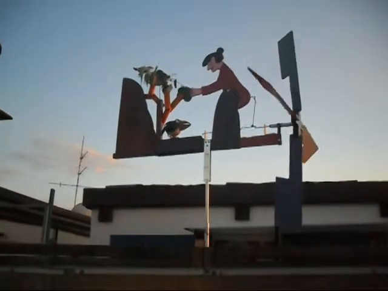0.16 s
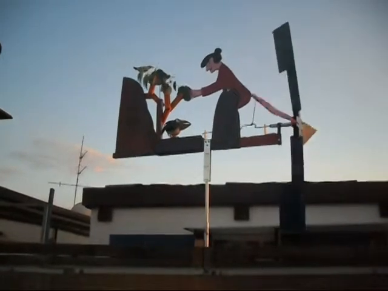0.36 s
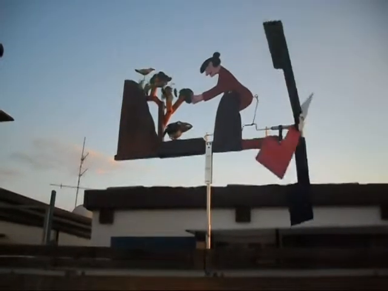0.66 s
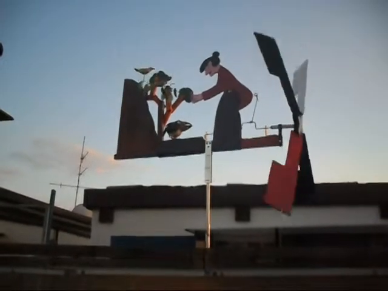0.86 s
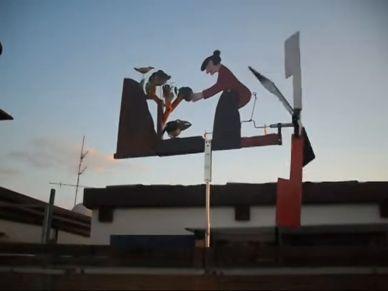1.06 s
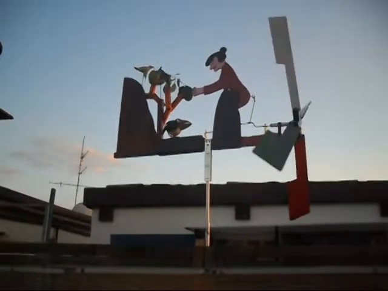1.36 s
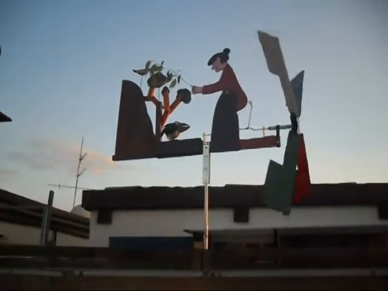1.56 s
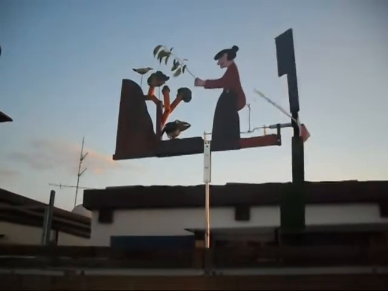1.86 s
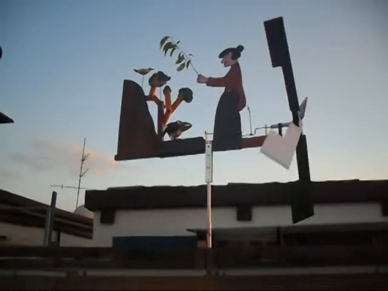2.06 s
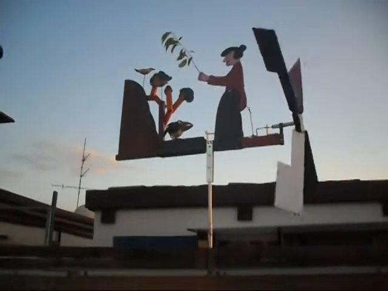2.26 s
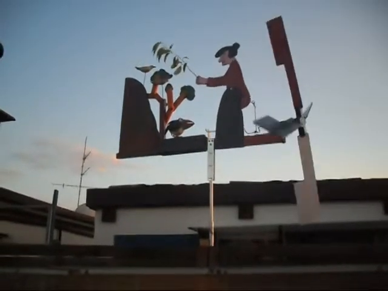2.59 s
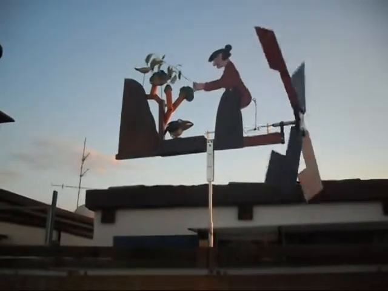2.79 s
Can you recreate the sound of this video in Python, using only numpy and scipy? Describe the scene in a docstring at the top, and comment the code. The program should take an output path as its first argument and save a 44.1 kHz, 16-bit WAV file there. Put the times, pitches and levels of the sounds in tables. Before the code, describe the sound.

Light wind thumps and rumbles low on a microphone outdoors, over faint distant traffic and hiss

```python
"""Low thumps of light wind on a small rooftop microphone at dusk, over far traffic hum and preamp hiss; a swish
passes once, a wooden whirligig ticks faintly. Wind: eddies, each about one cycle of pressure, in a listed set
and a dense random stream, plus slow sway. Traffic, swish and hiss: shaped patchy noise. Whirligig: decaying
sines and one tiny high squeak."""
import sys
import numpy as np
from scipy import signal
from scipy.fft import rfft, irfft
from scipy.io import wavfile
from scipy.ndimage import uniform_filter1d, map_coordinates

SR = 44100
rng = np.random.default_rng(int(sys.argv[2]) if len(sys.argv) > 2 else 0)


def store_pcm(level_fs):
    """Save levels as 16-bit WAV."""
    pcm = np.round(np.clip(level_fs, -1, 1) * 32767).astype(np.int16)
    wavfile.write(sys.argv[1], SR, np.atleast_2d(pcm).T)


def invert_db(level):
    """Linear amplitude ratio for a level in decibels (20 dB per decade), elementwise."""
    return 10 ** (np.asarray(level, dtype=float) / 20)


N = 129213

# course of the small eddies: t/s, level before trim/dB, median f/Hz
STREAM = [(0, -33.5, 72), (.1, -43, 74), (.2, -44, 67), (.4, -46.5, 64), (.62, -44.5, 67.6),
          (.74, -48.5, 85), (.82, -55.5, 93), (.96, -55, 87), (1.07, -50.5, 58.5), (1.18, -43.5, 60.7),
          (1.3, -47, 64), (1.42, -48.5, 73), (1.58, -47.5, 76), (1.72, -51, 90), (1.85, -61, 89),
          (1.96, -58.5, 95), (2.1, -54, 62), (2.3, -60, 51.7), (2.45, -57.5, 50), (2.62, -46, 60.6),
          (2.75, -57, 53), (2.93, -50.5, 61.6)]

# eddy pulse
WIDTH_CYCLES = 0.28
POINTED = 1.28  # exponent: 2 is a round bell, less is a sharper crest
LEAN_RAD = 0.88  # mean carrier phase: a dip leads the push
SHOVE = 0.1  # share of plain one-way pressure under the cycle


def unit(x):
    """Scale to rms 1."""
    return x / np.sqrt(np.mean(x ** 2) + 1e-20)


def curves(rows):
    """Interpolate each column after the time to one value per sample."""
    s, *columns = np.transpose(rows)
    t = np.arange(N) / SR
    return [np.interp(t, s, column) for column in columns]


def wobble(knots_per_s):
    """Smooth random curve: a spline through normal random knots."""
    knots = rng.standard_normal(int(N * knots_per_s / SR) + 4)
    return map_coordinates(knots, [np.arange(N) * knots_per_s / SR])


def rush(spectrum, patchy_db):
    """Coloured noise of rms 1 with random gain patches in time and frequency."""
    z = signal.stft(rng.standard_normal(N + SR), nperseg=512)[2]
    field = uniform_filter1d(rng.standard_normal(z.shape), size=6, axis=0)
    field = uniform_filter1d(field, size=12, axis=1)
    patchy = signal.istft(z * invert_db(patchy_db * unit(field)), nperseg=512)[1][:N + SR]
    f, db = np.transpose(spectrum)
    hz = np.fft.rfftfreq(len(patchy), 1 / SR)
    gain = invert_db(np.interp(np.log(hz + 1), np.log(f + 1), db))
    return unit(irfft(rfft(patchy) * gain, len(patchy))[:N])


def preamp_hiss():
    """Steady preamp noise as slightly patchy coloured noise."""
    # f/Hz, relative density/dB per Hz
    hiss_spectrum = [(300, -120), (1200, 5), (3000, 1.5), (5000, 0), (7000, -1.5), (10000, -3),
                     (10600, -6.5), (11000, -14), (11030, -120)]
    return invert_db(-71) * rush(hiss_spectrum, patchy_db=0.64)


def far_traffic():
    """Smooth far roar plus a separate upper edge that fades up over the first 1.3 s."""
    # roar: f/Hz, relative density/dB per Hz
    roar_spectrum = [(120, -120), (200, -7), (300, -0.5), (420, -6), (600, -4.5), (900, -4.5), (1300, -5.5),
                     (1700, -11), (2200, -16.5), (2800, -23.5), (4000, -27), (6000, -120)]
    # roar: t/s, level before trim/dB
    roar_level = [(0, -64), (1.13, -62), (1.73, -63), (2.4, -62), (2.93, -61.5)]
    # upper edge: f/Hz, relative density/dB per Hz
    edge_spectrum = [(1000, -53), (1500, -6.5), (1900, -2.5), (2400, -11.5), (3000, -17.5), (4000, -59)]
    # upper edge: t/s, level/dB
    edge_level = [(0, -91), (.6, -80), (1.3, -73), (1.9, -73), (2.4, -72.5), (2.93, -73)]
    trim_db = 0.5
    [roar_db] = curves(roar_level)
    [edge_db] = curves(edge_level)
    roar = invert_db(roar_db + trim_db + 0.27 * wobble(5.6)) * rush(roar_spectrum, patchy_db=0.84)
    return roar + invert_db(edge_db) * rush(edge_spectrum, patchy_db=3.0)


def swish():
    """One soft noise swell: fast rise, hold, slower fall; a late low part dulls its end."""
    # bright part: f/Hz, relative density/dB per Hz
    bright_spectrum = [(900, -60), (1800, -5), (2600, -2), (3500, 0), (4800, -2), (6000, -12), (9000, -60)]
    # low part: f/Hz, relative density/dB per Hz
    low_spectrum = [(500, -60), (1000, -5), (2100, 0), (3000, -3), (4500, -24)]
    start_s, rise_s, hold_s, fall_s = .99, .022, .04, .08
    low_delay_s, low_db, level_db = .03, 3.5, -69.5

    def swell(t):
        """Half-bell rise to t = 0, flat hold, half-bell fall."""
        rise = np.minimum(t, 0) / rise_s
        fall = np.maximum(t - hold_s, 0) / fall_s
        return np.exp(-.5 * rise ** 2 - .5 * fall ** 2)

    t = np.arange(N) / SR - start_s
    bright = invert_db(1.5 * wobble(40)) * swell(t) * rush(bright_spectrum, patchy_db=1.5)
    low = swell(t - low_delay_s) * rush(low_spectrum, patchy_db=1.1)
    return invert_db(level_db) * (bright + invert_db(low_db) * low)


def whirligig():
    """Loose wooden joint: ticks as sums of decaying modes, and one bell-windowed sine squeak."""
    # ticks: t/s, gain/dB
    ticks = [(1.4165, -59), (2.368, -65), (1.694, -67)]
    # joint modes: f/Hz, mean relative level/dB, t60/s
    joint = [(2100, -4, .01), (3500, -4, .01), (4800, -2, .009), (5500, -2, .008), (6400, -4, .008),
             (7300, -3, .009), (8000, -4, .009), (8900, -7, .007)]
    squeak_s, squeak_hz, squeak_db, squeak_width_s = 1.675, 8180, -70, .0033
    out = np.zeros(N)
    t = np.arange(SR // 20) / SR
    onset = 1 - np.exp(-t / 0.00016)
    for s, db in ticks:
        ring = np.zeros(len(t))
        for hz, level_db, t60_s in joint:
            decay = invert_db(level_db + rng.normal(0, 1.5) - 60 * t / t60_s)
            ring += decay * np.sin(2 * np.pi * hz * t)
        out[round(s * SR):][:len(t)] += invert_db(db) * ring * onset
    t = np.arange(N) / SR - squeak_s
    bell = np.exp(-.5 * (t / squeak_width_s) ** 2)
    return out + invert_db(squeak_db) * bell * np.sin(2 * np.pi * squeak_hz * t)


def slow_sway():
    """Slow pressure sway: low noise that partly follows the small-eddy level."""
    # f/Hz, relative density/dB per Hz
    sway_spectrum = [(8, -120), (16, -17), (28, -5.5), (42, -4), (70, -7.5), (130, -12), (190, -21.5),
                     (300, -33), (500, -120)]
    stream_db, _ = curves(STREAM)
    level_db = -49.5 + 0.53 * (stream_db - stream_db.mean()) + 2.78 * wobble(9)
    return invert_db(level_db) * rush(sway_spectrum, patchy_db=1.5)


def pushes(s, db, hz, lean_rad):
    """Each eddy is about one cycle of pressure under a bell-shaped window."""
    hop = 8  # pulses are summed at SR / hop, then upsampled
    lead = SR // hop * hop  # room for pulses that begin before t = 0
    offsets = np.arange(-SR // 20, SR // 20, hop)
    at = np.round(s * SR / hop).astype(int)[:, None] * hop + offsets
    cycles = (at / SR - s[:, None]) * hz[:, None]
    bell = np.exp(-.5 * np.abs(cycles / WIDTH_CYCLES) ** POINTED)
    cycle = np.cos(2 * np.pi * cycles - lean_rad[:, None])
    one_way = SHOVE * np.cos(lean_rad)[:, None]
    wave = invert_db(db)[:, None] * bell * (cycle + one_way)
    coarse = np.bincount(((at + lead) // hop).ravel(), wave.ravel(), (N + 3 * SR) // hop)
    return signal.resample_poly(coarse, hop, 1)[lead:][:N]


def small_eddies():
    """Dense stream of eddies at random times, with random size, pitch and phase."""
    eddies_per_s, trim_db = 120, 1
    size_spread_db, pitch_spread, lean_scatter_rad = 4.5, 0.39, 1.3  # pitch: sd of ln f
    count = int(eddies_per_s * N / SR)
    s = rng.uniform(0, (N - 1) / SR, count)
    size, pitch, lean = rng.standard_normal((count, 3)).T
    stream_db, median_hz = curves(STREAM)
    hz = median_hz[(s * SR).astype(int)] * np.exp(pitch_spread * pitch)
    hz = np.clip(hz, 25, 400)
    stream = unit(pushes(s, size_spread_db * size, hz, LEAN_RAD + lean_scatter_rad * lean))
    return invert_db(stream_db + trim_db) * stream


def listed_eddies():
    """Listed eddies on the microphone port, each a single low push."""
    # t/s, pulse level/dB, f/Hz
    thumps = [(0.006, -23, 71), (0.01, -33.5, 186), (0.021, -51, 52), (0.027, -30, 101),
              (0.031, -29.5, 118), (0.048, -38, 66.5), (0.074, -37.5, 155), (0.156, -29, 142),
              (0.136, -45, 150), (0.166, -36, 252), (0.172, -36.5, 240), (0.18, -36.5, 176),
              (0.185, -28, 79), (0.2, -30.5, 128), (0.223, -43, 90), (0.232, -38.5, 81), (0.241, -42, 111),
              (0.253, -31.5, 57.6), (0.304, -35, 136), (0.315, -33, 93.5), (0.334, -40, 237),
              (0.338, -40.5, 236), (0.345, -35, 79.4), (0.378, -34, 79), (0.41, -34, 85), (0.421, -43, 112),
              (0.439, -29.5, 128), (0.482, -33.5, 165), (0.49, -32.5, 87), (0.555, -30, 104),
              (0.596, -40, 138), (0.634, -30, 137), (0.661, -30, 189), (0.667, -28, 147),
              (0.679, -29.5, 226), (0.697, -33.5, 90), (0.73, -36, 112), (1.017, -32.5, 98),
              (1.037, -35.5, 55.7), (1.116, -36, 120), (1.138, -37.5, 84), (1.22, -29.5, 129),
              (1.229, -37.5, 185), (1.247, -30.5, 79), (1.256, -31, 146), (1.273, -32.5, 88),
              (1.363, -32.5, 77), (1.385, -39.5, 155), (1.457, -36, 98), (1.468, -36, 129),
              (1.48, -32.5, 109), (1.499, -31.5, 109), (1.522, -26.0, 103.3), (1.531, -34, 137),
              (1.546, -36.5, 118), (1.574, -38.5, 80), (1.605, -39.5, 138), (1.615, -38, 113),
              (1.631, -33, 100), (1.686, -45, 102), (1.714, -44, 148), (1.738, -42, 140), (1.77, -34, 93.5),
              (2.019, -34, 64.6), (2.036, -36.5, 165), (2.058, -26, 152), (2.086, -27.5, 123),
              (2.255, -43, 160), (2.438, -37, 49.4), (2.485, -42, 109), (2.512, -31, 58), (2.546, -34, 120),
              (2.585, -26, 129), (2.609, -33, 89.5), (2.62, -38, 163), (2.656, -47.5, 90),
              (2.706, -37, 120), (2.732, -36, 87.5), (2.77, -35.5, 200), (2.818, -35, 86.5),
              (2.826, -37.5, 177), (2.882, -32.5, 56.7), (2.895, -32.5, 149), (2.925, -35.5, 137)]
    lean_scatter_rad = 0.32
    s, db, hz = np.transpose(thumps)
    lean_rad = LEAN_RAD + lean_scatter_rad * rng.standard_normal(len(s))
    return pushes(s, db, hz, lean_rad)


def scene():
    """All outdoor sources, one channel."""
    wind = slow_sway() + small_eddies() + listed_eddies()
    return (far_traffic() + swish() + whirligig() + wind)[None]


def roll_off(x):
    """The treble ends steeply here."""
    return signal.sosfilt(signal.butter(12, 11100, fs=SR, output="sos"), x)


def record(dry):
    """Add the preamp hiss and return the finished recording."""
    mix = dry + preamp_hiss()
    return roll_off(mix)


dry = scene()
out = record(dry)
store_pcm(out)
```